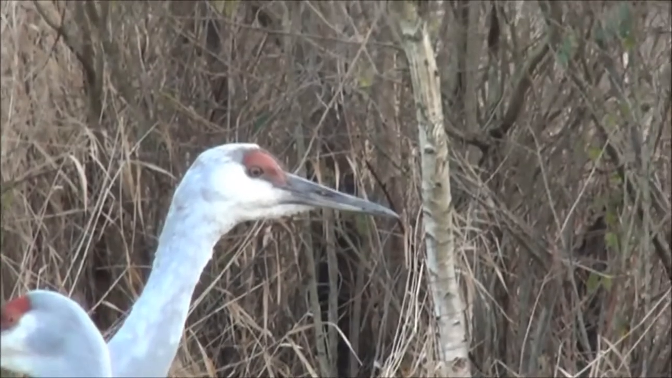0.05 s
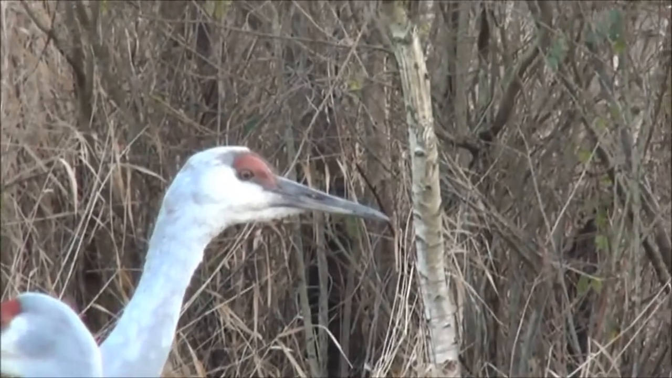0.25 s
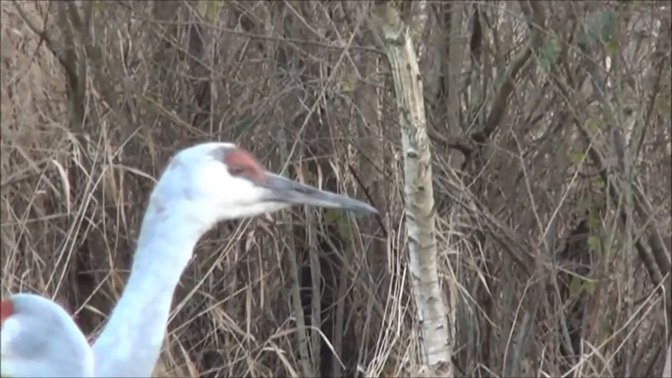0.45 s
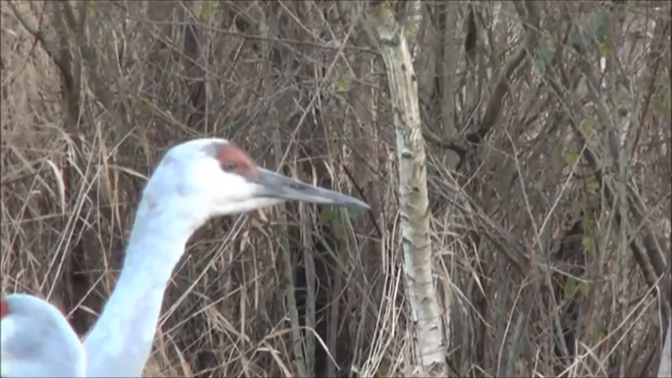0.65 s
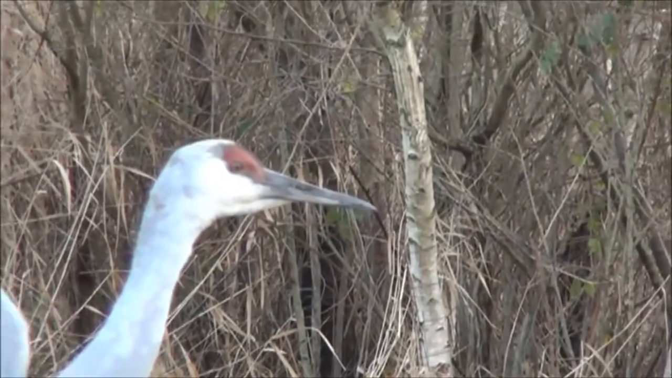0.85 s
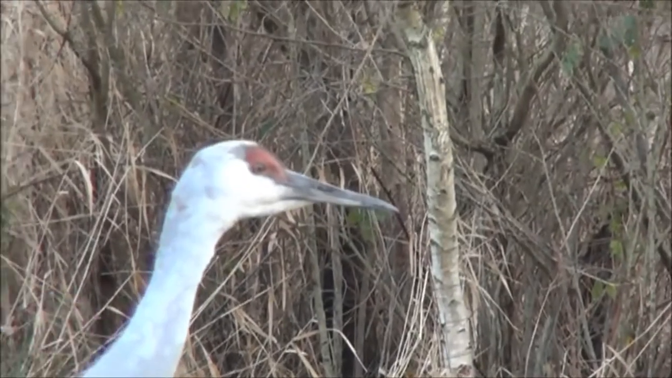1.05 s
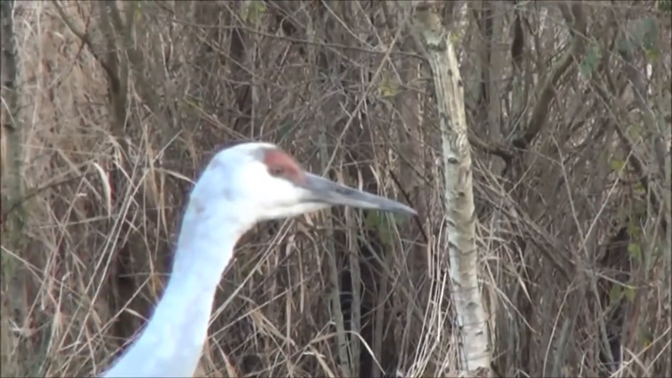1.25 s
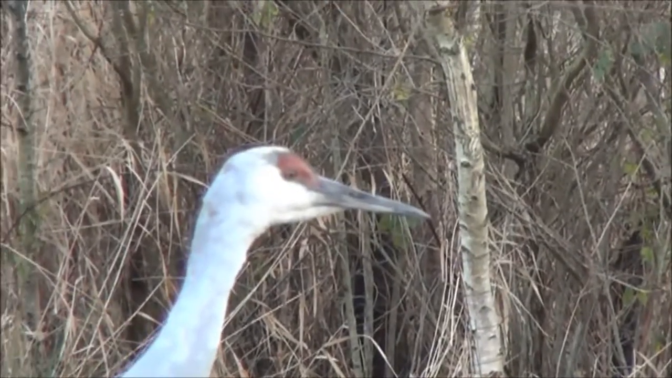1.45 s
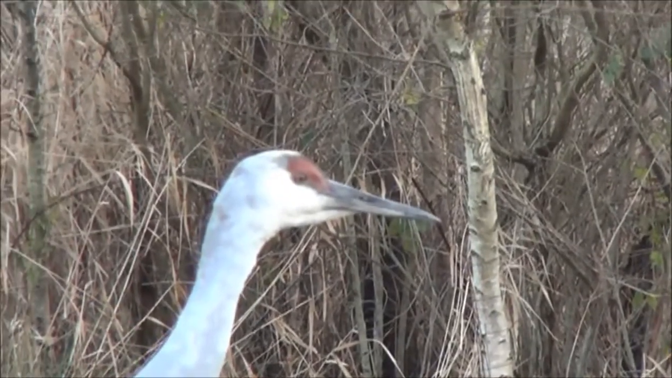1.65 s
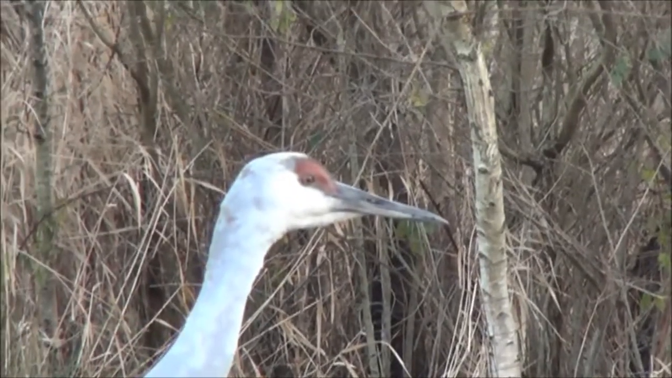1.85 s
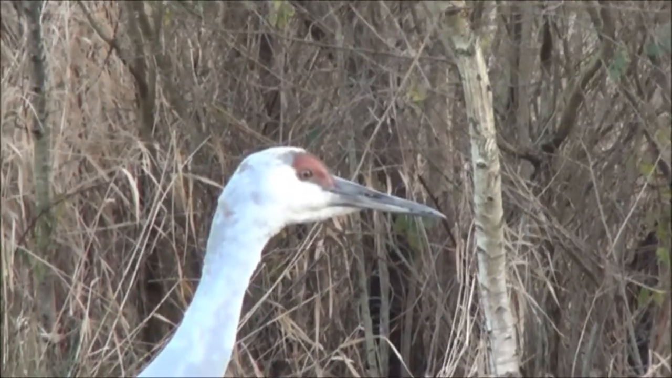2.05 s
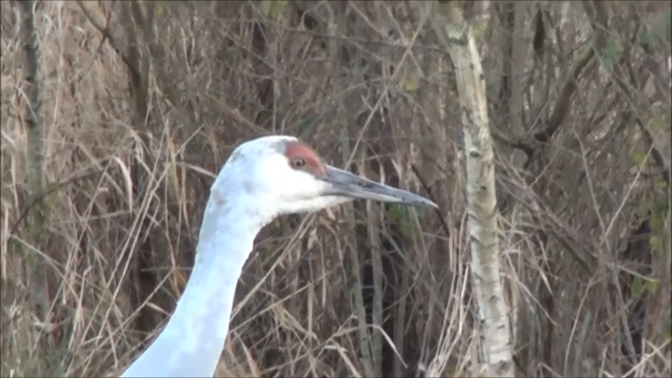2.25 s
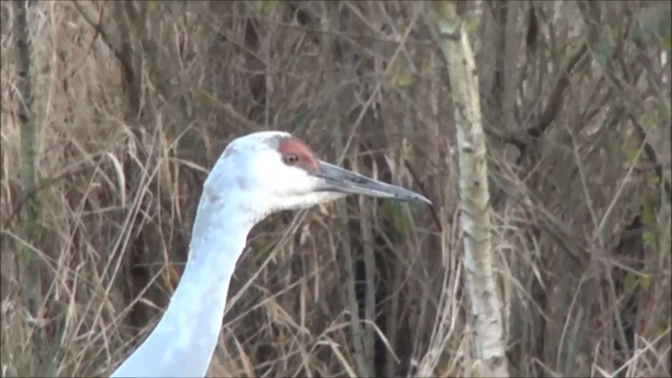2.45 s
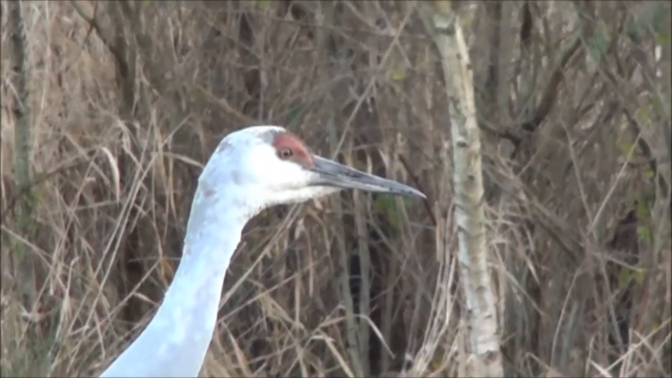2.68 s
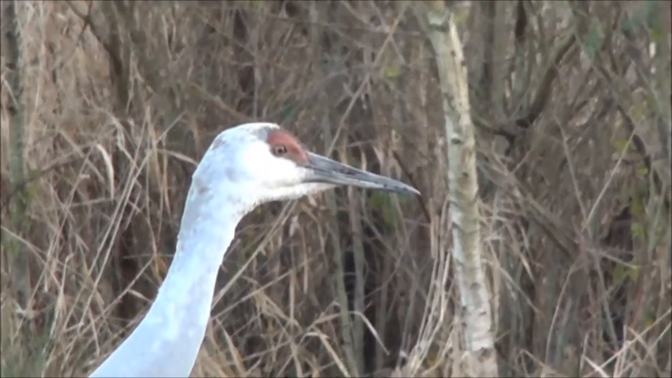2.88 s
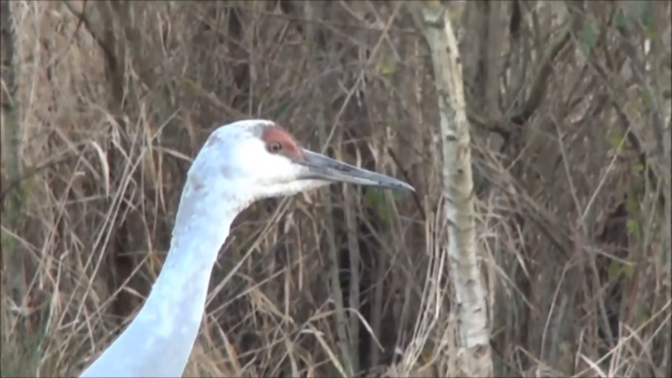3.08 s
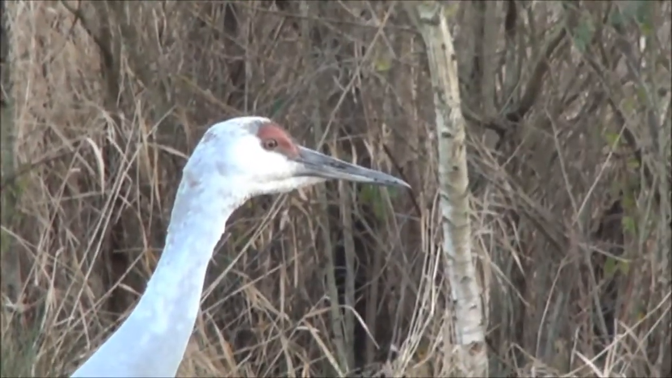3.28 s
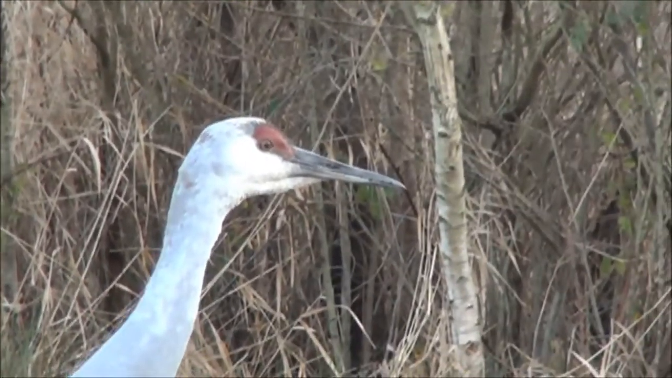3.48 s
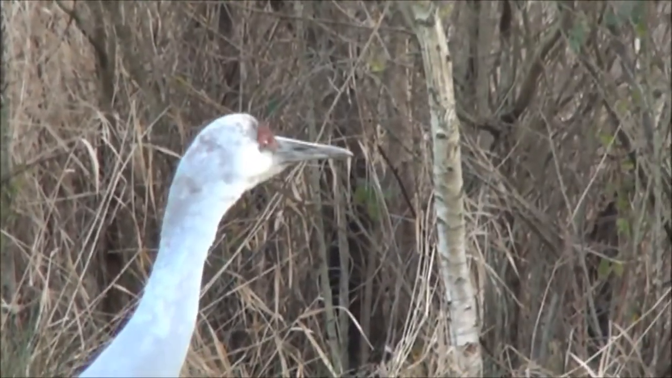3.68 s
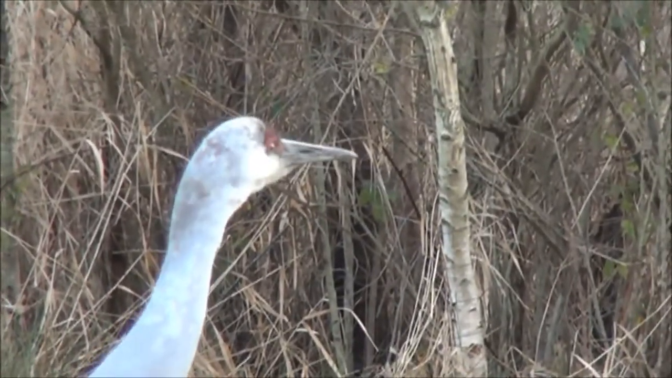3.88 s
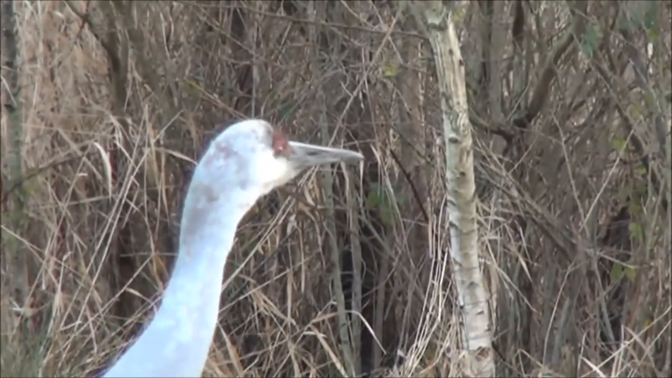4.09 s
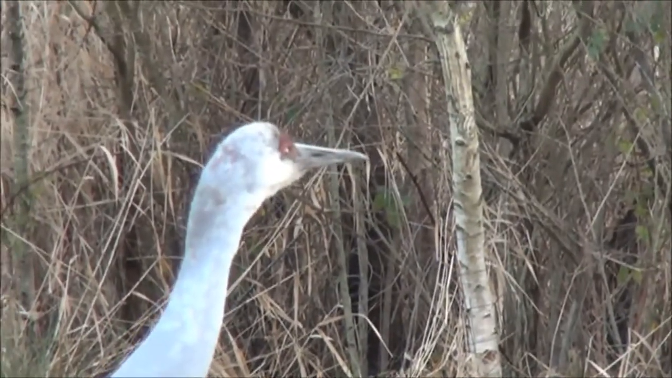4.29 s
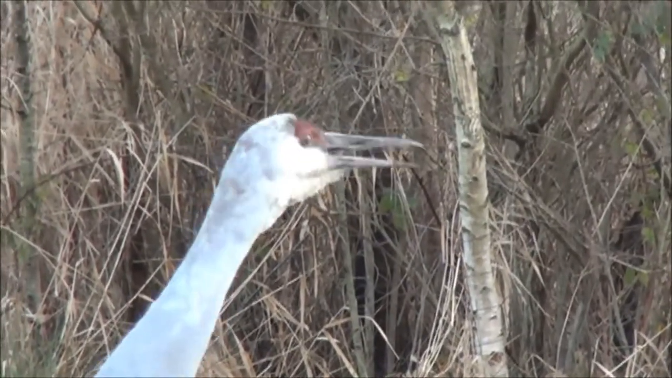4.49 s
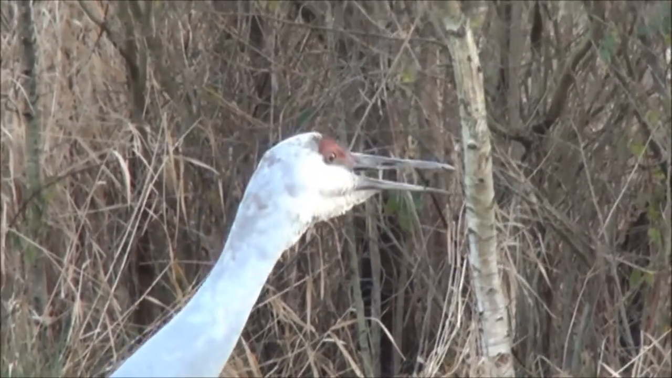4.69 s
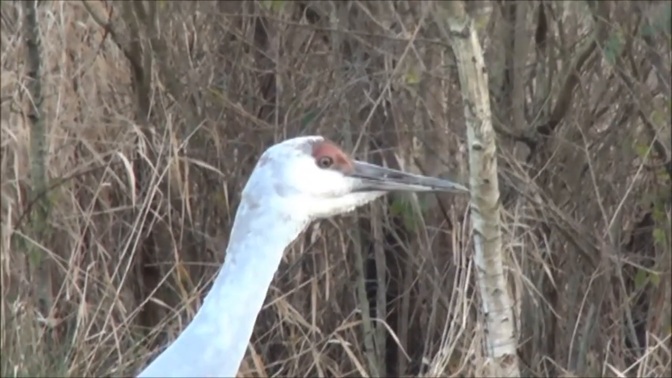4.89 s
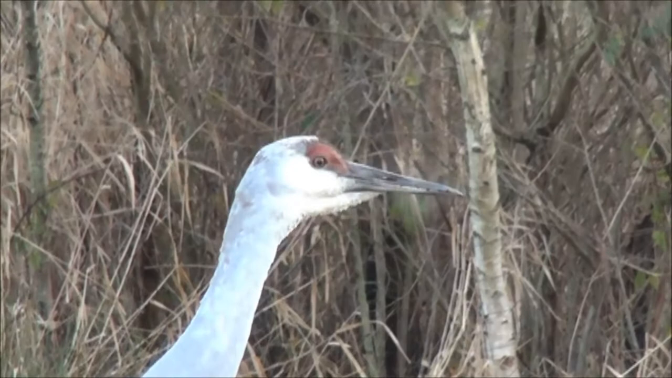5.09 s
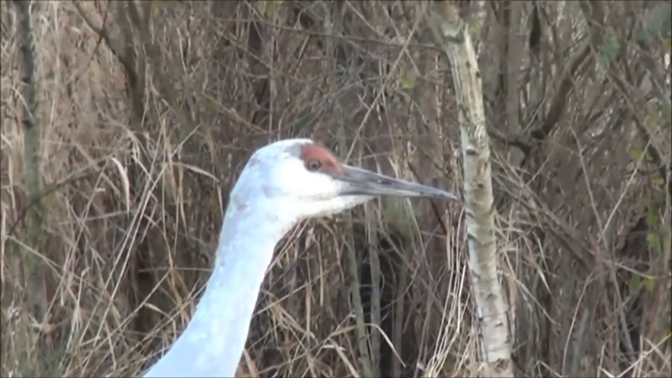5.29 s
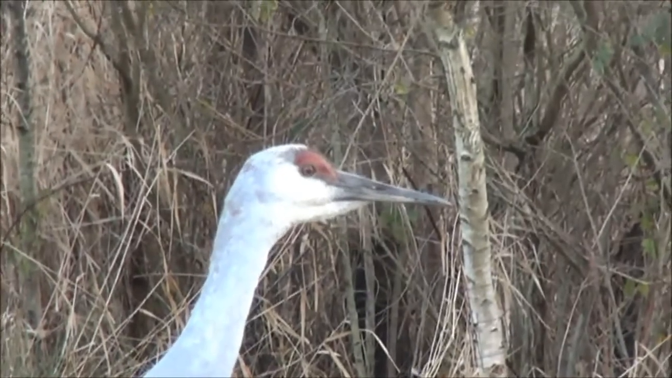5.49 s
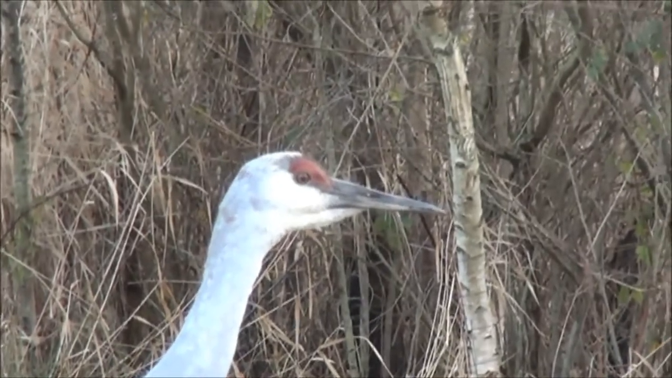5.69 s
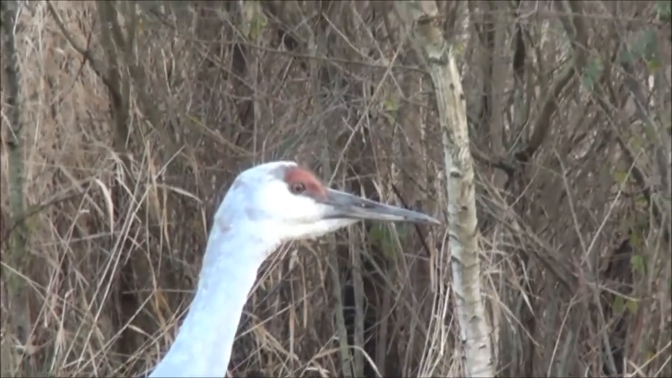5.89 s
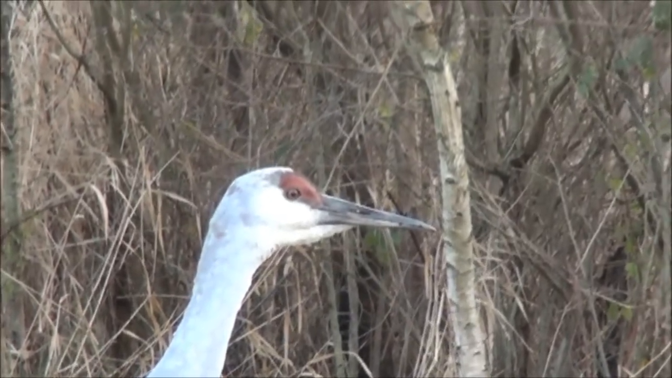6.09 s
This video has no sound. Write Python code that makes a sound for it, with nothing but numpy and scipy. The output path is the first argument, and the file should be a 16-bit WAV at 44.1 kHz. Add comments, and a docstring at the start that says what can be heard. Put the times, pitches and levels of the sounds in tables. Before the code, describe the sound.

Outdoor marsh ambience: steady deep rumble, soft hiss, dull distant clucking and dry rustling. Two very loud, throaty crane rattles stand far above everything, each about half a second or slightly longer, with a short break after the opening notes. High, quick peeps from a young bird overlap and follow the first. Short nasal quacks start just before the second and continue to the end. Centred sound, open air, faint woodland echo.

```python
"""A wetland: from the start, ducks cluck over a low rumble and hiss, made of shaped noise, and reeds rustle in grainy noise.
A songbird soon whistles two notes (gliding tones), and there is one splash.
At about 2.1 s cranes rattle out a call (bursts of pulses repeated by the windpipe); a young one trills on two whistles.
At about 4.2 s near quacks (pulses ringing a throat) begin, and a second crane call follows.
The background sinks under each phrase of a call and creeps back."""
import sys
import numpy as np
from scipy import signal
from scipy.io import wavfile
from scipy.ndimage import uniform_filter1d

SR = 44100
rng = np.random.default_rng(int(sys.argv[2]) if len(sys.argv) > 2 else 0)


def wrap_up_sound(samples):
    """Save the sound to the file named by the first command line argument, as 16-bit audio."""
    columns = np.atleast_2d(samples).T
    # keep every value between -1 and 1, then stretch to whole-number steps
    tamed = np.clip(columns, -1, 1)
    steps = np.round(tamed * 32767).astype(np.int16)
    wavfile.write(sys.argv[1], SR, steps)


N = 270774  # length in samples
TOP_HZ = 16100  # nothing sounds above this

# Colour of the far rumble: f/Hz, relative level per Hz/dB
RUMBLE_COLOUR = [(15, -24), (25, -20), (63, -3.5), (113, 0.5), (145, -6), (175, -2), (200, -10),
                 (265, -12.5), (295, -17.5), (420, -26.5), (550, -88), (920, -120)]
# Colour of the hiss: f/Hz, relative level per Hz/dB
HISS_COLOUR = [(180, -59), (300, -4.5), (605, -6.5), (1000, -10.5), (1220, -11.5), (1600, -12.5),
               (1820, -13), (4350, -22), (12100, -22.5), (15200, -25.5), (16300, -45)]
# How alike the two ears hear the noise: f/Hz, likeness (1 = same)
EAR_LIKENESS = [(30, .95), (125, .988), (300, .96), (1000, .975), (5000, .95), (12000, .99)]
# Common background level: at first, and while sunk; each layer then sets its own level from it
FIRST_DB, SUNK_DB, SINK_S = -44, -54.5, .17
CREEP_DB_PER_S, SLOW_CREEP_DB_PER_S = 5.5, 2  # the slow one runs before the first call

# Far quacks and clucks: t/s, level/dB, pulse rate f/Hz, length/ms, throat pitch as a factor
FAR_CLUCKS = [(.0, -59, 117, 115, 0.97), (0.199, -48.5, 90.2, 78, 1.07), (0.291, -55, 147.4, 52, 0.9),
              (.391, -41, 226, 66, 0.85), (.603, -52, 154, 16, 0.78), (0.659, -54, 228, 37, 0.92),
              (.735, -49.5, 79, 77, 1.02), (.925, -48, 162, 10.4, 0.96), (1.01, -47.5, 168, 28, 0.97),
              (1.24, -50.5, 224, 35, 1.47), (1.283, -50, 45.6, 44, 1.13), (1.773, -49.5, 122.6, 11, 1.11),
              (3.51, -57.5, 70.1, 61, 0.81), (3.72, -51.5, 200.6, 13, 0.53), (5.94, -41, 158.3, 14.7, 0.95),
              (6.05, -49.5, 162, 15, 0.95), (6.099, -56.5, 101.2, 19, 0.99)]
# Near quacks: t/s, length/s, first level/dB, last level/dB, first rate f/Hz, last rate f/Hz, closing note level/dB
NEAR_QUACKS = [(4.24, 0.14, -35, -31, 153.5, 228, -60), (4.558, 0.084, -46, -43.5, 185.5, 194.6, -70),
               (4.82, 0.12, -39.5, -41, 170, 188.5, -70), (5.148, 0.1, -37, -38.5, 154.5, 178.4, -43),
               (5.473, 0.097, -39.5, -39.5, 154.9, 171.2, -51),
               (5.813, 0.079, -39, -39.5, 150.3, 168.4, -56)]
# Resonances of a duck's throat: f/Hz, width/Hz (before widening), level/dB
DUCK_THROAT = [(320.4, 99, -0.5), (742, 510, -6), (1350, 246, -0.5), (1771, 290, 6), (2233, 625, -7),
               (3270, 380, -21.5), (5580, 2340, -18.5)]
QUACK_RISE_S, QUACK_FADE_DB_PER_S = 0.016, 756
CLIMB = 0.25  # time constant of the rise in rate, as a share of the quack's length
CLOSING_HZ, CLOSING_MS = 1500, 32  # the short pure note on which a quack closes

# Rustles in the reeds: t/s, level/dB, length/ms
REED_RUSTLES = [(0.029, -62, 26), (.28, -55.5, 47), (0.579, -51, 38), (0.749, -56, 14), (0.829, -51, 83),
                (0.963, -51.5, 9.2), (1.13, -52.5, 59), (1.402, -51.5, 78), (1.529, -58, 61),
                (1.659, -49, 77), (1.835, -49.5, 11.5), (1.95, -53.5, 76), (2.028, -51.5, 74),
                (3.201, -60, 75), (3.5, -60, 15), (3.543, -51, 34), (3.92, -62, 56), (4.11, -58.5, 28),
                (4.2, -56.5, 51), (5.332, -50, 12), (5.345, -59, 36), (5.66, -62.5, 28), (5.929, -62, 40)]
# Splashes: t/s, level/dB, length/ms, centre f/Hz
WATER_SPLASHES = [(0.193, -53, 46, 3600)]
RUSTLE_HZ = 8900

# Songbird notes: t/s, length/ms, first f/Hz, last f/Hz, level/dB, upper side tone relative level/dB
SONG_NOTES = [(.125, 80, 3240, 3225, -51, -7), (.215, 350, 3370, 3140, -58, -30)]

# Phrases of the crane calls: start t/s, end t/s, first air level/dB, last air level/dB,
# first pulse pairing level/dB, last pulse pairing level/dB
CALL_PHRASES = [(2.117, 2.212, -31.5, -34, -19, -4), (2.256, 2.73, -32.5, -49, -21.5, -20),
                (4.27, 4.411, -33.5, -34, -31, -25), (4.479, 4.93, -30.5, -39, -23, -20)]
# Colour of the breath: f/Hz, relative level per Hz/dB
BREATH_COLOUR = [(300, -26), (600, -1.5), (2000, -0.5), (5000, -7.5), (9000, -12.5), (15000, -24.5),
                 (17000, -44)]
AIR_RISE_S, AIR_FADE_DB_PER_S = 0.03, 350

# Crane syllables: t/s, level/dB, first f/Hz, length/ms, overtones relative level/dB
CRANE_SYLLABLES = [(2.119, -24.5, 1220, 3.4, -46), (2.124, -18, 1164, 10.7, -10),
                   (2.14, -14.5, 1260, 6.5, -9.5), (2.153, -21, 1230, 11.4, -8.5),
                   (2.161, -21.5, 1205, 12.8, -3), (2.175, -19.5, 1300, 32.5, -8.5),
                   (2.207, -40, 1300, 36, -11), (2.255, -22, 880, 6.9, -32), (2.264, -18, 1018, 13, -14.5),
                   (2.276, -17, 1130, 15.3, -11), (2.290, -16.5, 1057, 11.3, -16.5),
                   (2.313, -33, 960, 28, -10.5), (2.354, -17, 1130, 9, -16), (2.363, -17, 1050, 9, -18),
                   (2.386, -16.5, 803, 10.3, -8.5), (2.398, -19, 935, 9, -15), (2.411, -17, 1110, 11, -15),
                   (2.448, -16.5, 802, 8.3, -11), (2.457, -14, 1015, 6.2, -14.5), (2.497, -16, 960, 8, -11),
                   (2.506, -16.5, 790, 10, -12), (2.538, -25, 1025, 7.2, -10),
                   (2.556, -16.5, 814, 10, -10.5), (2.608, -17.5, 820, 9.4, -9.5),
                   (2.655, -20.5, 829, 10.6, -6.5), (2.705, -22, 926, 5, -18.5),
                   (4.338, -22.5, 1200, 13.4, -11), (4.351, -18, 1018, 17, -14.5),
                   (4.364, -16, 832, 46.3, -14.5), (4.398, -15.5, 970, 6.1, -35),
                   (4.485, -16.5, 1152, 10, -13.5), (4.494, -16.5, 1034, 8.4, -22),
                   (4.522, -21, 990, 19.5, -10), (4.54, -19, 1165, 24, -8.5), (4.557, -19.5, 1174, 12, -10),
                   (4.566, -13.5, 966, 12.3, -23), (4.615, -17, 1130, 13.4, -16.5),
                   (4.626, -16, 961, 11.8, -16), (4.649, -16.5, 820, 9.1, -10.5),
                   (4.667, -15.5, 1140, 10.8, -18), (4.695, -25, 1166, 9, -5.5),
                   (4.712, -14, 926, 10.7, -14), (4.753, -17, 1046, 9.7, -14), (4.769, -16, 826, 10, -11),
                   (4.780, -17, 830, 8.7, -17), (4.796, -17.5, 962, 8.5, -11.5), (4.823, -20, 810, 10, -10),
                   (4.84, -23, 930, 8.5, -8), (4.875, -19, 787, 10, -9), (4.921, -18.5, 769, 6.9, -5),
                   (4.974, -26, 968, 6.3, -18.5)]
# Colour of a crane's overtones: f/Hz, relative level/dB
BILL_COLOUR = [(1500, 3.5), (2100, 7.5), (2800, 2), (3600, 8.5), (4600, 6.5), (5800, 6), (7500, 1),
               (10000, -9.5), (13000, -9.5), (16000, -64)]
WINDPIPE_MS, SAG = 10.3, .05  # round trip in the coiled windpipe; share of pitch lost per trip
ECHO_DB, ECHO_DB_PER_MS = -7, -0.88  # loss per trip, and more per ms of syllable beyond HELD_MS
GLIDE, HELD_MS = .075, 11  # share of pitch lost across a syllable; longer ones are held steadier
RASP, PUFF_DB = .4, -11  # flutter of the overtones; noise puffed out beside them

# Notes of the young crane: t/s, level/dB, low f/Hz, high membrane relative level/dB
YOUNG_NOTES = [(2.542, -35, 2400, 3), (2.637, -29.5, 2700, -4), (2.714, -31, 2850, 4),
               (2.786, -28, 2780, -1.5), (2.853, -28, 2595, -2), (2.921, -29, 2600, -2),
               (2.971, -28, 2482, -9), (3.035, -42, 2430, -4)]
PEEP_MS = 21
HIGH_HZ, HIGH_RATIO = 3330, 1.24  # the high membrane sits a ratio above the low one, up to a ceiling

# Near scatter from ground and brush: f/Hz, time to fall 60 dB t/s
NEAR_SCATTER = [(500, 0.1), (1000, 0.096), (3000, 0.17), (8000, 0.096)]
# Far echoes from the trees: f/Hz, time to fall 60 dB t/s
TREE_ECHOES = [(500, 1), (1000, 1.4), (3000, 1.57), (8000, 1.3)]


def gain_of(db):
    """Turns decibels into a plain factor."""
    return 10 ** (np.asarray(db) / 20)


def evened(x):
    """Scales a signal to an average strength (RMS) of 1."""
    return x / np.sqrt(np.mean(x ** 2) + 1e-20)


def read(points, hz):
    """Reads a table of values between its points, on a log-frequency axis."""
    f, value = np.transpose(points)
    return np.interp(np.log(hz + 1), np.log(f + 1), value)


def add(mix, s, sound):
    """Lays a sound into the mix at a time in seconds."""
    part = mix[round(s * SR):][:len(sound)]
    part += sound[:len(part)]


def resonate(x, hz, width):
    """A two-pole resonance of gain 1 at its centre, like a hollow that rings."""
    b, a = signal.iirpeak(min(hz, .45 * SR), hz / width, SR)
    return signal.lfilter(b, a, x)


def sweep(hz):
    """Adds up a changing pitch into a phase in radians."""
    return 2 * np.pi * np.cumsum(hz, axis=-1) / SR


def wobbling(shape, size):
    """Slow random movement: noise smoothed over a number of samples."""
    return evened(uniform_filter1d(rng.standard_normal(shape), size=size))


def swell(ms, rise):
    """Envelope that rises over a share of its length and rounds off."""
    u = np.linspace(0, 1, round(ms * SR / 1000))
    return np.sin(np.pi / 2 * np.minimum(u / rise, 1)) * np.cos(np.pi / 2 * u ** 3)


def held(t, start, end, first_db, last_db, rise_s, fade_db_per_s):
    """Gain that rises, slides from one level to another, and dies away."""
    slide_db = np.interp(t, (start, end), (first_db, last_db))
    slide_db = slide_db - fade_db_per_s * np.maximum(t - end, 0)
    return np.clip((t - start) / rise_s, 0, 1) * gain_of(slide_db)


def wash(colour, level_db, patchy_db, flicker_db, size):
    """Stereo noise from random short-time spectra, with drifting patches and a shared flicker."""
    hop = size // 4
    frames, hz = N // hop + 5, np.fft.rfftfreq(size, 1 / SR)
    a, b, c, d, patches = rng.standard_normal((frames, len(hz), 5)).T
    patches = uniform_filter1d(patches, size=9, axis=0)
    patches = evened(uniform_filter1d(patches, size=9, axis=1))
    flicker = wobbling(frames, 3)
    same = np.clip(read(EAR_LIKENESS, hz), -1, 1)[:, None]
    left = a + 1j * b
    right = same * left + np.sqrt(1 - same ** 2) * (c + 1j * d)
    colour_db = read(colour, hz)[:, None] + patchy_db * patches + flicker_db * flicker
    spectra = np.array([left, right]) * gain_of(colour_db)
    noise = signal.istft(spectra, nperseg=size, noverlap=size - hop)[1][:, :N]
    return gain_of(level_db) * evened(noise)


def background():
    """Far rumble, and the hiss of air, water and distant birds, as two washes that sink together."""
    t = np.arange(N) / SR
    level_db = FIRST_DB + SLOW_CREEP_DB_PER_S * t
    for start, end, *_ in CALL_PHRASES:
        level_db = np.where(t < start, level_db, SUNK_DB + CREEP_DB_PER_S * np.maximum(t - end, 0))
    # average over the past only, so that each sinking starts with its phrase
    sink = round(SINK_S * SR)
    level_db = uniform_filter1d(level_db, sink, origin=sink // 2 - 1)
    rumble = wash(RUMBLE_COLOUR, level_db + 1.5, patchy_db=2.5, flicker_db=0.17, size=4096)
    hiss = wash(HISS_COLOUR, 0.82 * level_db - 19, patchy_db=4.0, flicker_db=1.1, size=512)
    return rumble + hiss


def quack(level_db, hz, throat=1, rough=.27, second_db=-15):
    """Uneven pulses and puffs of noise ring a duck's throat; the second harmonic stays clear."""
    wobble = wobbling(len(hz), 150)
    turns = .9 + np.cumsum(hz * (1 + .07 * rough * wobble)) / SR
    pulses = np.diff(np.floor(turns), prepend=0) * gain_of(2.0 * rng.standard_normal(len(hz)))
    puffs = np.exp(-(turns % 1) / .35) * rng.standard_normal(len(hz))
    drive = (1 - rough) * evened(pulses) + rough * evened(puffs)
    voice = np.zeros(len(hz))
    for k, (f, width, db) in enumerate(DUCK_THROAT):
        once = resonate(drive, f * throat, 1.15 * width)
        twice = resonate(once, f * throat, 1.15 * width)
        voice += (-1) ** k * gain_of(db) * twice  # neighbours take opposite signs
    second = gain_of(second_db) * np.sin(2 * 2 * np.pi * turns)
    return gain_of(level_db) * (evened(voice) + second)


def ducks():
    """Far quacks are short and dull; near ones climb in rate and close on a pure note."""
    out = np.zeros(N)
    for s, db, hz, ms, throat in FAR_CLUCKS:
        shape = swell(ms, rise=.15)
        arch = hz * (1.02 - .28 * np.linspace(0, 1, len(shape)) ** 3)
        voice = quack(db, arch, throat, rough=.1, second_db=-30)
        b, a = signal.butter(2, 2800, fs=SR)  # distance dulls the treble
        add(out, s, signal.lfilter(b, a, voice) * shape)
    for s, length, first_db, last_db, first_hz, last_hz, closing_db in NEAR_QUACKS:
        t = np.arange(SR // 4) / SR
        hz = last_hz - (last_hz - first_hz) * np.exp(-t / (CLIMB * length))
        level = held(t, 0, length, first_db, last_db, QUACK_RISE_S, QUACK_FADE_DB_PER_S)
        add(out, s, quack(0, hz) * level)
        shape = swell(CLOSING_MS, rise=0.18)
        note = np.sin(2 * np.pi * CLOSING_HZ * np.arange(len(shape)) / SR)
        add(out, s + length, gain_of(closing_db) * shape * note)
    return out


def rustles():
    """Reeds and a splash: grainy bursts of wide hiss, a little different in each ear."""
    out = np.zeros((2, N))
    for s, db, ms, hz in [(*row, RUSTLE_HZ) for row in REED_RUSTLES] + WATER_SPLASHES:
        shape = swell(ms, rise=0.23)
        grain = gain_of(4.9 * wobbling(len(shape), 60))
        both, left, right = rng.standard_normal((3, len(shape)))
        for ear, own in zip(out, (left, right)):
            hiss = resonate((both + 0.25 * own) * grain, hz, 0.57 * hz)
            add(ear, s, gain_of(db) * shape * evened(hiss))
    return out


def songbird():
    """A short note, then a falling whistle: a gliding tone with a weaker tone on each side."""
    out = np.zeros(N)
    for s, ms, first_hz, last_hz, db, side_db in SONG_NOTES:
        shape = swell(ms, rise=.1) ** .5
        turn = sweep(np.linspace(first_hz, last_hz, len(shape)))
        below = gain_of(-13) * np.sin(.895 * turn)
        above = gain_of(side_db) * np.sin(1.1 * turn)
        add(out, s, gain_of(db) * shape * (np.sin(turn) + below + above))
    return out


def breath():
    """Air rushes through the open bills in each phrase: fluttering noise that follows the phrases."""
    t = np.arange(N) / SR
    level = sum(held(t, *row[:4], AIR_RISE_S, AIR_FADE_DB_PER_S) for row in CALL_PHRASES)
    return level * wash(BREATH_COLOUR, 0, patchy_db=5.0, flicker_db=1.0, size=256)


def syllable(s, db, first_hz, ms, overtones_db):
    """A burst of membrane pulses, repeated duller and a little lower by each round trip in the windpipe."""
    shape = swell(ms, rise=0.21)
    echo_db = min(ECHO_DB + ECHO_DB_PER_MS * max(ms - HELD_MS, 0), 0)
    glide = np.linspace(1, 1 - GLIDE * min(HELD_MS / ms, 1), len(shape))
    hz = first_hz * glide * (1 + .008 * wobbling(len(shape), 90))
    flutter = 1 + RASP * wobbling(len(shape), 30)
    puff = gain_of(PUFF_DB) * evened(resonate(rng.standard_normal(len(shape)), 4400, 6300))
    # pairing: every other pulse is stronger, by the setting of the phrase under way
    phrase = [row for row in CALL_PHRASES if row[0] < s + AIR_RISE_S][-1]
    start, end, _, _, first_db, last_db = phrase
    pairing = gain_of(np.interp(s, (start, end), (first_db, last_db)))
    out = np.zeros(len(hz) + SR // 20)
    for trip in range(4):
        turn = sweep(hz * (1 - SAG) ** trip)
        overtones = np.zeros(len(hz))
        for k in range(3, 21):
            overtones += gain_of(read(BILL_COLOUR, k * hz)) * np.cos(k * turn) * (k * hz < TOP_HZ)
        upper = gain_of(overtones_db - 2.8 * trip) * shape ** 2.8 * (evened(overtones * flutter) + puff)
        lower = shape * (np.cos(turn) - gain_of(-17) * np.cos(2 * turn))
        pulses = (lower - upper) * (1 + pairing * np.cos(turn / 2))
        add(out, trip * WINDPIPE_MS / 1000, gain_of(db + trip * echo_db) * pulses)
    return out


def peep(db, low_hz, high_db):
    """Two membranes whistle in quick throbs: the low one leads and bends up, the high one ends the note."""
    shape = swell(PEEP_MS, rise=0.29)
    high_hz = min(HIGH_HZ, HIGH_RATIO * low_hz)
    t, u = np.arange(len(shape)) / SR, np.linspace(0, 1, len(shape))
    pitches = np.array([low_hz + 0.64 * (high_hz - low_hz) * u ** 3, high_hz + 0 * u])
    low, high = sweep(pitches * (1 + 0.045 * wobbling((2, len(t)), 130)))
    throb = .6 - 0.54 * np.cos(2 * np.pi * 125 * t)
    low = np.sin(low) + gain_of(-22) * np.sin(2 * low)
    high = np.sin(high) + gain_of(-18) * np.sin(2 * high) + gain_of(-18) * np.sin(3 * high)
    # the two throb in turn
    both = throb * low + gain_of(high_db) * (1.2 - throb) * (0.14 + u) * high
    return gain_of(db) * shape * both


def echoes(x, decays):
    """Sparse echoes of random sign, each band dying at its own speed."""
    taps = np.zeros((2, SR))
    at = np.arange(120, SR - 20, 20) + rng.integers(0, 20, (2, (SR - 121) // 20))
    np.put_along_axis(taps, at, rng.choice([-1., 1.], at.shape), 1)
    taps[1] = 1.03 * taps[0] + 0.071 * taps[1]  # the right ear hears nearly the same echoes
    hz, t, z = signal.stft(taps, SR, nperseg=256)
    decay = gain_of(-60 * t / read(decays, hz)[:, None])
    tail = signal.istft(z * decay, SR, nperseg=256)[1]
    return signal.fftconvolve(x[None], tail / np.linalg.norm(tail[0]), axes=1)[:, :N]


def scene():
    """Birds at their places from left to right, their echoes, and the background."""
    flock = ducks() + songbird()
    cranes, young = np.zeros(N), np.zeros(N)
    for s, *row in CRANE_SYLLABLES:
        add(cranes, s, syllable(s, *row))
    for s, *row in YOUNG_NOTES:
        add(young, s, peep(*row))
    no_bass = signal.butter(4, 460, "high", fs=SR, output="sos")
    cranes = signal.sosfilt(no_bass, cranes)  # a narrow bill radiates no bass
    cranes = cranes + gain_of(4) * resonate(cranes, 1960, 260)  # the throat rings on near two kilohertz
    # left and right gains in dB
    direct = cranes * gain_of([[.3], [-.3]]) + young * gain_of([[.2], [-.2]])
    direct = direct + flock * gain_of([[1.2], [-1.2]])
    near = echoes(gain_of(-11) * cranes + gain_of(-6) * young + gain_of(-5) * flock, NEAR_SCATTER)
    far = echoes(gain_of(-20.5) * cranes + gain_of(-20.5) * young + gain_of(-30.0) * flock, TREE_ECHOES)
    return background() + rustles() + breath() + direct + near + far


def record(dry):
    """A steep low-pass filter takes away everything above the top frequency."""
    low_pass = signal.firwin(511, TOP_HZ, window=("kaiser", 9), fs=SR)
    return signal.oaconvolve(dry, low_pass[None], "same")


dry = scene()
out = record(dry)
wrap_up_sound(out)
```